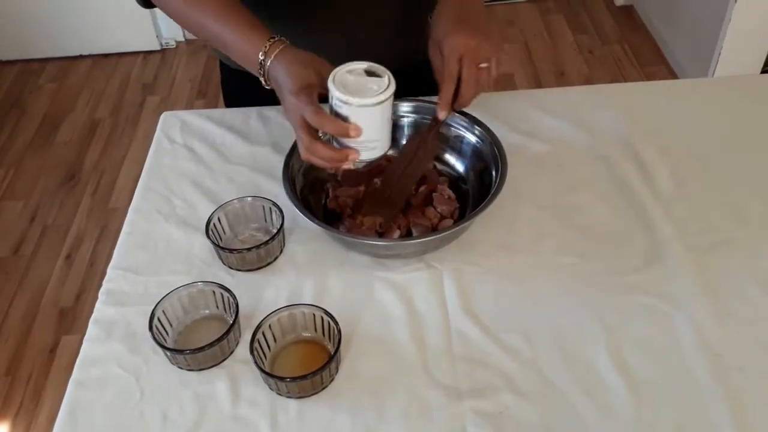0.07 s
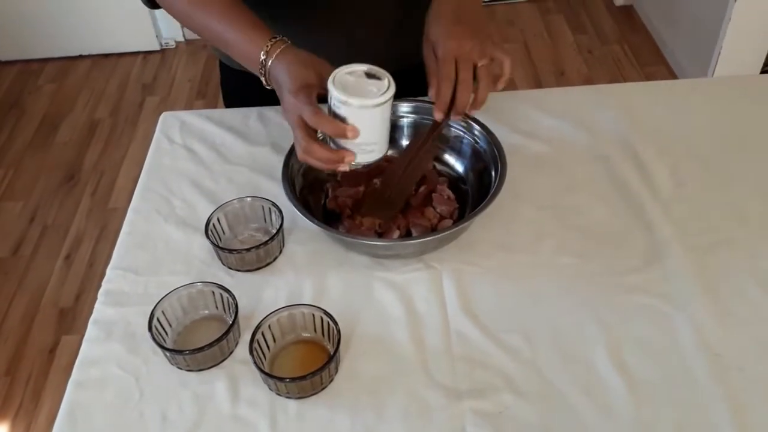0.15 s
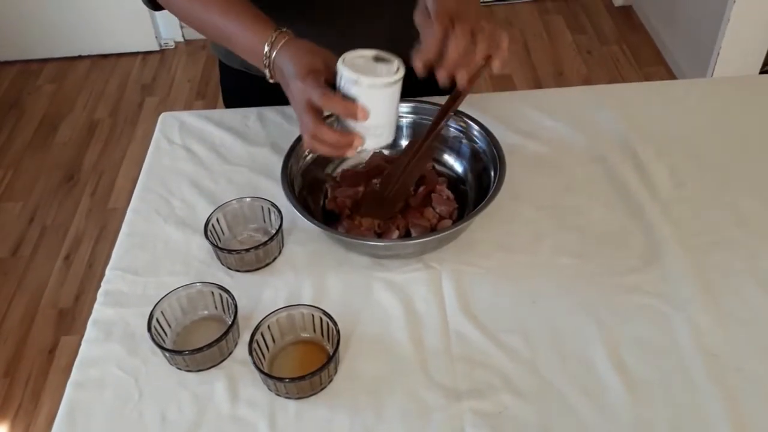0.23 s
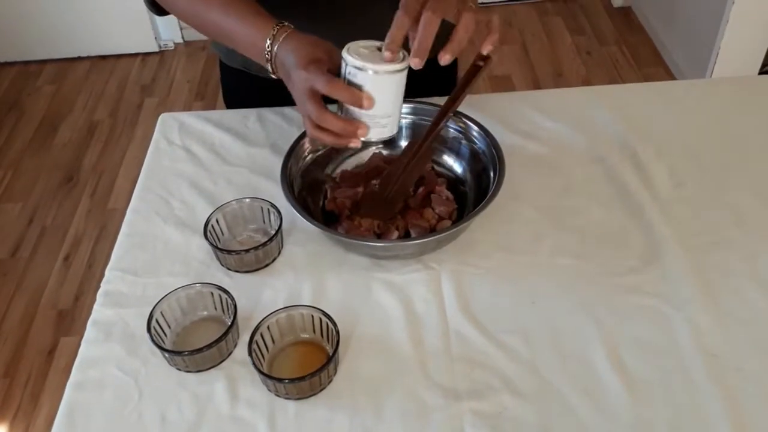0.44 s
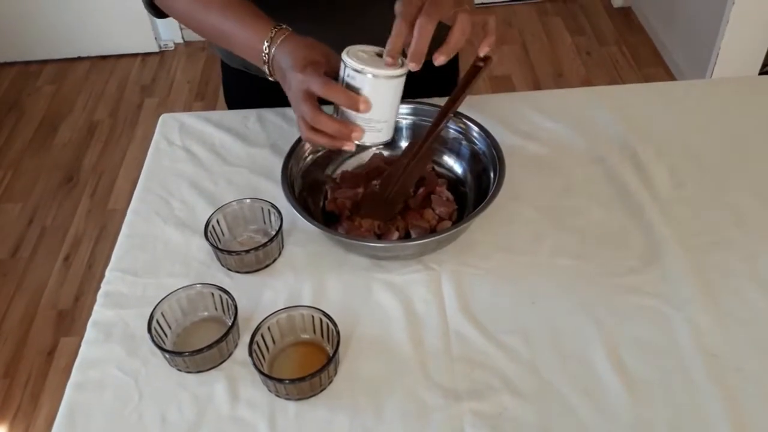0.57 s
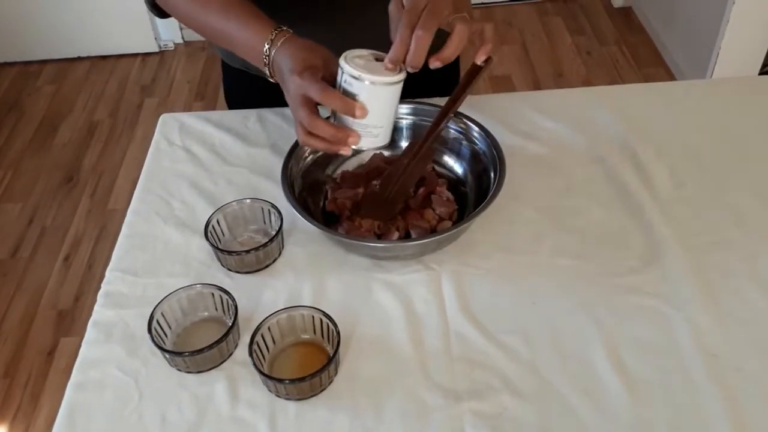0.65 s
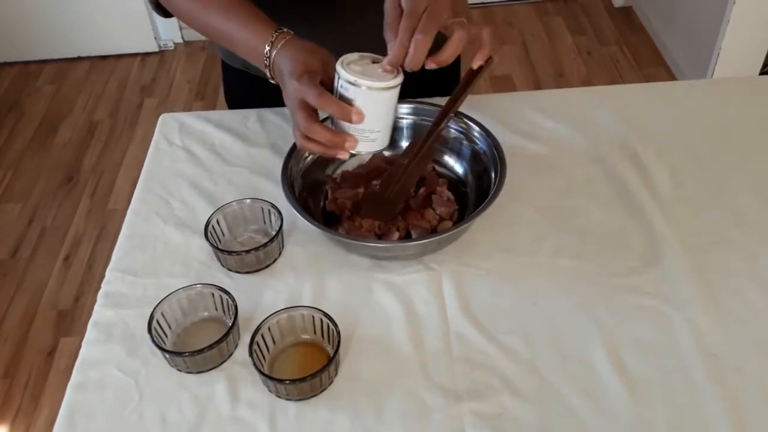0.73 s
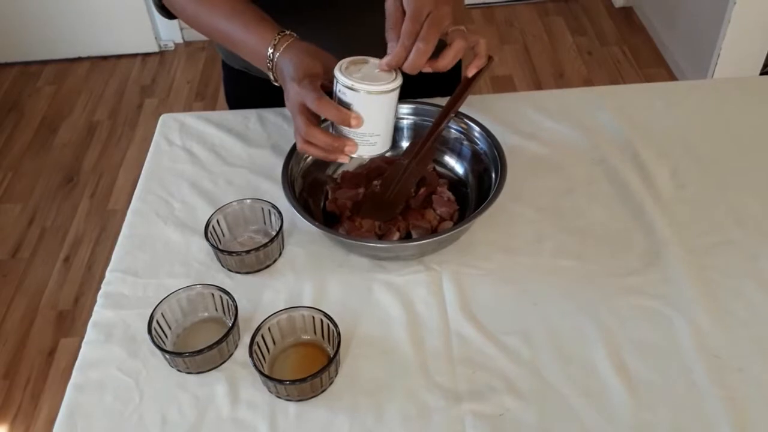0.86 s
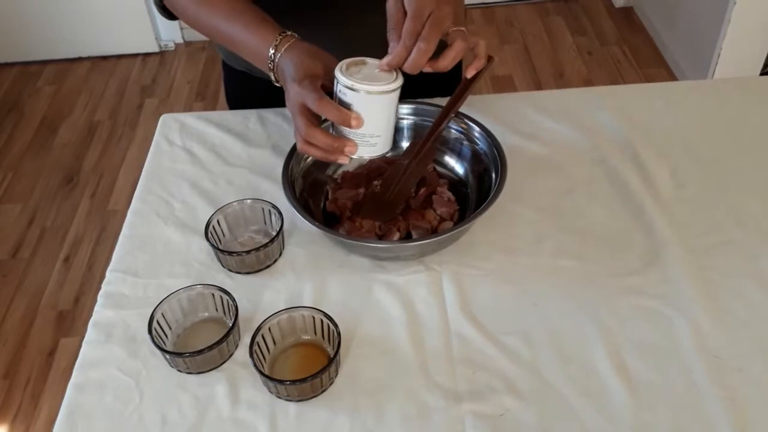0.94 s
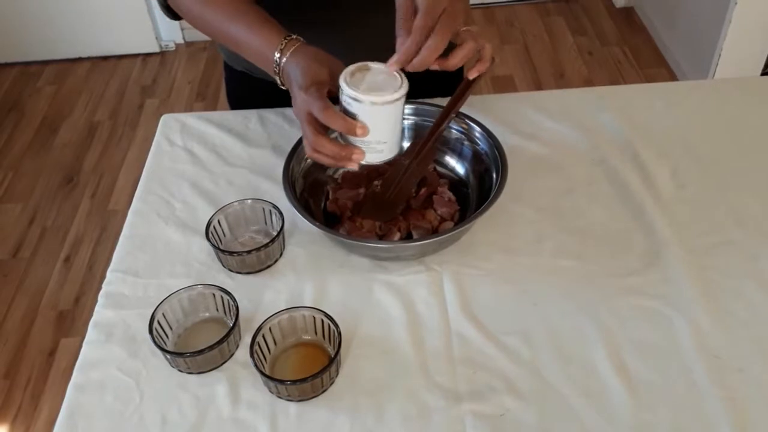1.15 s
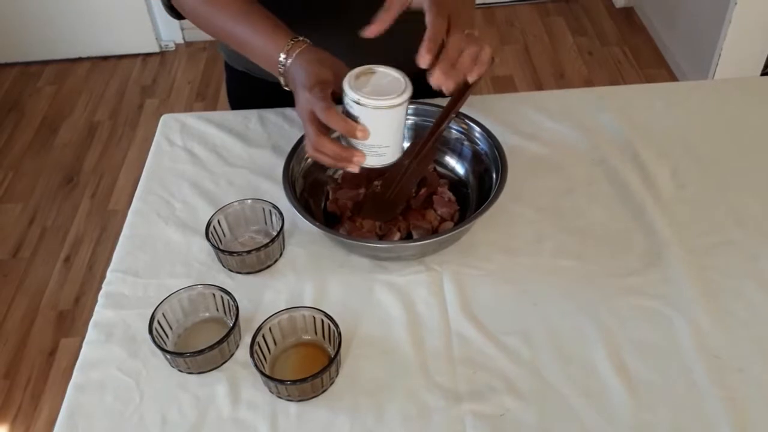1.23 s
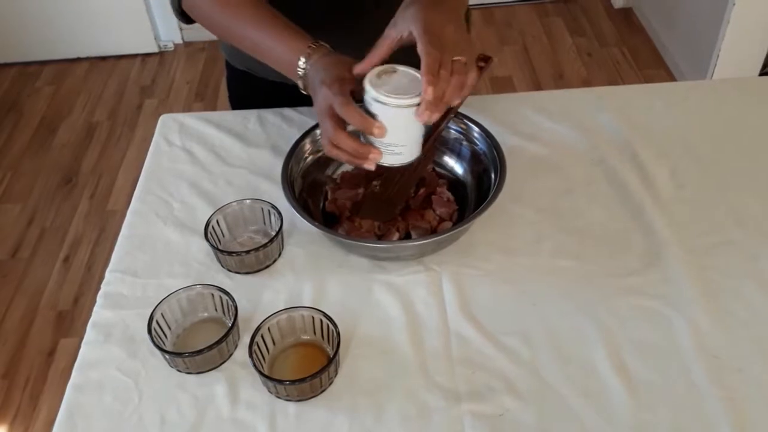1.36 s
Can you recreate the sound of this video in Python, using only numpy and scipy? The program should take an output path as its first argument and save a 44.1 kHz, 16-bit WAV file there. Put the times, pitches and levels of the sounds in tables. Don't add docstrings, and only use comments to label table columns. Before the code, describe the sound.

A steel mixing bowl rings out as a wooden spoon grazes its rim at 0.17 seconds and strikes at 0.2, with an almost instant bounce. The bright, wavering ring decays over about a second. At 0.44 the spoon settles with a faint dull knock. Quiet skin rubbing follows, with small plastic lid clicks and nail taps around 0.7, 0.88 and 0.96, over soft kitchen hum.

```python
import sys
import numpy as np
from scipy import signal
from scipy.fft import rfft, irfft
from scipy.io import wavfile

SR = 44100
rng = np.random.default_rng(int(sys.argv[2]) if len(sys.argv) > 2 else 0)


def voltage_ratio(decibels):
    exponent = np.asarray(decibels, float) / 20
    return 10 ** exponent


def file_out(sig):
    cols = np.atleast_2d(sig).T
    lim = np.clip(cols, -1, 1)
    pcm = np.round(lim * 32767).astype(np.int16)
    wavfile.write(sys.argv[1], SR, pcm)


N = 61739

# [t/s, level/dB]
BLOWS = [
    (0.2033, -4),
    (0.2112, -7),
]
# [t/s, level/dB]
KNOCKS = [
    (.2045, -40),
    (.4387, -30.5),
]


def evened(x):
    return x / np.sqrt(np.mean(x ** 2) + 1e-20)


def read(points, hz):
    f, value = np.transpose(points)
    return np.interp(np.log(hz + 1), np.log(f + 1), value)


def add(mix, s, sound):
    part = mix[round(s * SR):][:len(sound)]
    part += sound[:len(part)]


def rise(size, seconds):
    return 1 - np.exp(-np.arange(size) / SR / max(seconds, 1e-4))


def ring(hz, db, t60, length_s):
    t = np.arange(round(length_s * SR))[:, None] / SR
    decay = voltage_ratio(db - 60 * t / np.asarray(t60))
    return decay * np.sin(2 * np.pi * np.asarray(hz) * t)


def coloured(points, size):
    gain = voltage_ratio(read(points, np.fft.rfftfreq(size, 1 / SR)))
    return evened(irfft(rfft(rng.standard_normal(size)) * gain, size))


def resonate(x, hz, width_hz):
    return signal.lfilter(*signal.iirpeak(hz, hz / width_hz, SR), x)


def bowl():
    # [f/Hz, level/dB, t60/s, side of the node line +-1]
    body_modes = [(956.6, -39.2, .85, 1), (966, -29.8, .58, 1), (968.7, -31.5, .8, -1),
                  (983.7, -34, .65, -1), (2254.3, -18.9, .39, -1), (2258.4, -22.3, .53, 1),
                  (2282.1, -18.6, .09, -1), (2279.9, -30.8, .48, 1), (2289.3, -30.3, .78, 1),
                  (4064.9, -22.6, .33, 1), (4078.3, -20, .31, -1), (4104.2, -35.6, .33, -1),
                  (3895, -44, 1.2, 1), (4135, -34.3, .85, 1)]
    chime_modes = [(3379.4, -31.7, .45, -1), (3418.6, -36.4, .51, 1), (3430.7, -34.1, .51, 1),
                   (3442, -23.4, .38, -1), (3579.2, -21.4, .43, 1), (3583.4, -21.3, .29, 1),
                   (3591.9, -21.9, .45, 1), (3600.2, -16.5, .35, -1), (3624.9, -24.5, .75, -1),
                   (3638.8, -35.2, .39, -1)]
    rim_modes = [(4009, -37, .7, 1), (4648, -20, .17, 1), (4731, -28, .47, 1), (4738, -30, .44, -1),
                 (4965, -36, .5, 1), (4982, -39, .5, -1), (5190, -24, .18, 1), (5366, -29, .46, 1),
                 (5456, -41, .68, 1), (5608, -33, .3, 1), (6115, -32, .33, 1), (6275, -38, .45, 1),
                 (6827, -41, .45, 1), (7272, -32, .28, 1)]
    wall_modes = [(1014.3, -33.3, .38, -1), (1187.9, -37.2, .81, -1), (1216, -31.1, .37, 1),
                  (1229.4, -40, .57, 1), (1243.7, -35.5, 1.1, 1), (1264.3, -25.6, .3, -1),
                  (1340, -32, .3, 1), (1485, -32, .1, 1), (1925.4, -37.3, .65, -1),
                  (1949.5, -29.7, .41, -1), (1964.3, -30.2, .47, 1), (2125, -44, .8, 1), (800, -33, .3, 1),
                  (4182, -31, .3, 1)]
    lip_modes = [(5350, -43.7, .47, -1), (4390, -42, .6, 1), (5219, -43.5, .8, -1), (5905, -50, .8, 1),
                 (6026, -38, .3, 1), (6445, -45, .5, 1), (7050, -38, .3, 1), (7495, -40, .3, 1),
                 (7760, -49, .5, 1), (8010, -52, .6, 1), (8440, -58, .65, 1), (10890, -54, .45, 1)]
    settle_modes = [(533.9, -45.7, .38, 1), (573.6, -40.4, .22, -1), (586, -44, .46, 1),
                    (603.8, -44.3, .52, -1), (639.1, -42.4, .39, -1), (669.5, -54.2, .63, -1)]
    tone_db = 1.04
    strike_s, rise_s, bounce_delay_s, first_share = .2032, .0006, .0085, .55

    hz, db, t60, side = np.transpose(body_modes + chime_modes + rim_modes + wall_modes + lip_modes)
    tone = ring(hz, db + tone_db, t60, 1) @ np.sign(side)
    swell = first_share * rise(len(tone), rise_s)
    add(swell, bounce_delay_s, (1 - first_share) * rise(len(tone), rise_s))
    out = np.zeros(N)
    add(out, strike_s, tone * swell)
    hz, db, t60, side = np.transpose(settle_modes)
    add(out, KNOCKS[-1][0], ring(hz, db, t60, 0.56) @ side)
    return out


def clash():
    # [f/Hz, level/dB]
    shimmer = [(300, -32), (800, -8), (1250, -5.5), (1550, 2), (2800, -3.5), (7300, -7.5), (8500, -18),
               (15500, -18)]
    # [f/Hz, level/dB]
    crack_spectrum = [(150, -11), (600, -8.5), (1250, -11.5), (2500, -3.5), (3700, 2), (6000, -7.5),
                      (10000, 4.5), (15500, -6)]
    # [f/Hz, level/dB, t60/s]
    graze_modes = [(2010, 0, 0.058), (2203, -20.5, 0.15), (3580, -24, 0.143), (3285, -30.5, 0.19),
                   (4200, -22, 0.12), (5188, -20.5, 0.06975), (5625, -21.5, .12), (6200, -25, 0.1577),
                   (8130, -26, 0.11), (8800, -32.5, 0.093), (11650, -33, .04), (12890, -28, .08)]
    # [f/Hz], [level/dB], [t60/s]
    clack_hz = [1280, 3643, 9980]
    clack_db = [-11, -11.5, -28]
    clack_t60_s = [0.026, 0.086, 0.011]
    shimmer_db, shimmer_spread_db, shimmer_t60_s, shimmer_fall = -39, 1.2, .2, 0.11
    crack_db, crack_t60_s = -19.5, 0.015
    graze_s, graze_db, graze_rise_s, graze_shell_db = .1685, -32, .004, -34

    pick = rng.random((700, 4))
    faint_hz = 300 + 16000 * pick[:, 0] ** 1.2
    level_db = shimmer_db + read(shimmer, faint_hz) + shimmer_spread_db * (4 * pick[:, 3] - 2)
    t60 = shimmer_t60_s * (.5 + pick[:, 1]) * (faint_hz / 4000) ** -shimmer_fall
    fade = np.hanning(.8 * SR)[-round(.4 * SR):]
    shell = ring(faint_hz, level_db, t60, .4) @ np.sign(pick[:, 2] - .5) * fade

    out, t = np.zeros(N), np.arange(2048) / SR
    for s, blow_db in BLOWS:
        add(out, s, voltage_ratio(blow_db) * shell * rise(len(shell), 0.00014))
        decay = voltage_ratio(blow_db + crack_db - 60 * t / crack_t60_s)
        add(out, s, decay * coloured(crack_spectrum, 2048) * rise(2048, .0003))
        add(out, s, ring(clack_hz, blow_db + np.array(clack_db), clack_t60_s, .05).sum(1))
    hz, db, t60 = np.transpose(graze_modes)
    touch = ring(hz, db + graze_db, t60, .4).sum(1) + voltage_ratio(graze_shell_db) * shell
    add(out, graze_s, touch * rise(len(touch), graze_rise_s))
    return out


def spoon():
    # [f/Hz, level/dB, t60/s]
    wood_modes = [(198.4, -18, .08), (294.7, -12, 0.0792), (346, -8, .07), (650, 0, .03), (1520, 7, 0.015),
                  (2236, 4.5, .018), (2750, -4, 0.018), (1240, -1, 0.01462)]
    knock_rise_s = .0004
    thump_hz, thump_width_hz, thump_db, thump_t60_s, thump_rise_s = 188, 140, -35.5, 0.32, 0.11

    out = np.zeros(N)
    hz, db, t60 = np.transpose(wood_modes)
    for s, knock_db in KNOCKS:
        knock = ring(hz, db, t60, .4).sum(1)
        add(out, s, voltage_ratio(knock_db) * knock * rise(len(knock), knock_rise_s))
    t = np.arange(SR // 2) / SR
    boom = resonate(rng.standard_normal(len(t)), thump_hz, thump_width_hz)
    boom = evened(resonate(boom, thump_hz, thump_width_hz))
    swell = 1 - np.exp(-t / thump_rise_s)
    add(out, BLOWS[0][0], boom * swell * voltage_ratio(thump_db - 60 * t / thump_t60_s))
    return out


def lid():
    # [t/s, level/dB]
    pressure = [(0.439, -53), (0.676, -84), (0.682, -51), (0.749, -51.5), (.775, -63), (.815, -59),
                (.845, -54), (.91, -57), (0.993, -55), (1.022, -92), (1.13, -73)]
    # [f/Hz, width/Hz, level/dB]
    resonances = [(250, 180, -2), (667, 50, -2.5), (863, 216, 0.5), (1190, 180, -1.5), (1520, 240, 5.5),
                  (1990, 150, -1.5), (2850, 190, -6.5), (3750, 740, 0), (5130, 270, -14), (6460, 390, -9.5),
                  (9700, 1100, -9), (12700, 2000, -9.5)]
    # [t/s, level/dB, brightness/(dB/octave), length/s]
    snaps = [(.6975, -47, 0, .002), (.7065, -48, 0, .002), (.712, -47, 0, .002), (.748, -46, 1, .002),
             (1.09, -50, -9, .03), (1.262, -54, -8, .004), (.6800, -45, 0, .003), (.8755, -40, 3, .003),
             (.9625, -39, 3, .005), (.4385, -47, 6, .001), (.589, -57, 5, .002), (.855, -51, 7, .0005),
             (.868, -50, 7, .0005), (.876, -48, 7, .0005), (.889, -48, 7, .0005), (.922, -52, 7, .0005),
             (.9397, -49, 7, .0005), (.951, -52, 6, .0005)]
    grains_per_s, grain_spread_db, rub_tilt_db, rub_low_db = 1400, 3.5, -2.5, 0
    snap_rise = .2

    t, (when, db) = np.arange(N) / SR, np.transpose(pressure)
    grains = voltage_ratio(grain_spread_db * np.minimum(rng.exponential(1, N), 2.5))
    grains *= rng.random(N) < grains_per_s / SR
    grains = grains * rng.standard_normal(N) + 0.18 * rng.standard_normal(N)
    parts = np.array([resonate(grains, f, w) * voltage_ratio(d + rub_tilt_db * np.log2(f / 2000)) / np.sqrt(w)
                      for f, w, d in resonances])
    press = voltage_ratio(np.interp(t, when, db, right=-100))
    low = evened(resonate(parts[0], 343, 290))
    out = evened(parts[1:].sum(0)) * press + voltage_ratio(rub_low_db) * low * np.sqrt(press * voltage_ratio(-62))
    out *= t > when[0]

    u = np.arange(1024) / SR
    for s, snap_db, tilt_db, length in snaps:
        push = rng.standard_normal(1024) * voltage_ratio(-20 * u / length) * rise(1024, snap_rise * length)
        snap = np.zeros(1024)
        for f, w, d in resonances:
            gain = voltage_ratio(d + tilt_db * np.log2(f / 2000)) / np.sqrt(w)
            snap += resonate(resonate(push, f, 2 * w), f, w) * gain
        add(out, s, voltage_ratio(snap_db) * snap / abs(snap).max())
    return out


def nail_taps():
    # [t/s, level/dB, f/Hz, length/s]
    tap_events = [(.6795, -43.5, 770, 0.0046), (.6798, -45, 2210, .004), (.695, -45, 707, 0.0044),
                  (.705, -49, 745, 0.0037), (.7055, -48.5, 3730, 0.0023), (.7215, -45, 1627, 0.0083),
                  (.730, -54, 1557, 0.0066), (.7435, -42.5, 650, 0.0024), (.7435, -46.5, 1640, 0.0027),
                  (.866, -60, 1590, 0.0055), (.875, -44.5, 3510, 0.0035), (.8755, -42.5, 980, 0.0027),
                  (.8765, -47, 1680, 0.0034), (.961, -47.5, 3750, 0.0017), (.9615, -41, 914, 0.0041),
                  (.9625, -45, 1630, 0.005), (.969, -45.5, 1910, 0.0027), (.981, -59, 1615, 0.0058),
                  (1.005, -76, 1600, .009)]
    out = np.zeros(N)
    for s, tap_db, hz, length in tap_events:
        t = np.arange(0, 2 * length, 1 / SR)
        swell = np.sin(np.pi * np.sqrt(t / (2 * length))) ** 2
        add(out, s, voltage_ratio(tap_db) * swell * np.sin(2 * np.pi * hz * t))
    return out


def kitchen(x):
    # [f/Hz, t60/s]
    reverb_t60 = [(150, 0.13), (600, 0.61), (2000, 0.35), (5000, 0.45), (9000, 0.3), (15000, 0.26)]
    reflections = np.zeros(SR)
    at = np.arange(300, SR - 20, 20)
    reflections[at + rng.integers(0, 20, len(at))] = rng.choice([-1., 1.], len(at))
    hz, t, z = signal.stft(reflections, SR, nperseg=256)
    decay = voltage_ratio(-60 * t / read(reverb_t60, hz)[:, None])
    tail = signal.istft(z * decay, SR, nperseg=256)[1]
    return signal.fftconvolve(x, tail / np.linalg.norm(tail))[:N]


def hum():
    # [f/Hz, level/dB]
    hiss_spectrum = [(12, -52.5), (20, -11.5), (102, -7.5), (165, -10), (372, -8), (416, -20.5),
                     (1510, -17.5), (14700, -38.5), (16500, -44)]
    # [f/Hz, width/Hz, level/dB]
    drone_peaks = [(395, 140, -10.5), (1088, 6.7, -9.5), (1530, 13, -12.5)]
    hiss_db, drone_db = -65, -67
    noise, drone = rng.standard_normal(N), np.zeros(N)
    for f, w, d in drone_peaks:
        drone += evened(resonate(resonate(noise, f, w), f, w)) * voltage_ratio(d) * np.sqrt(w)
    return voltage_ratio(hiss_db) * coloured(hiss_spectrum, N) + voltage_ratio(drone_db) * evened(drone)


def scene():
    low_cut_hz, tone_room_db, room_db = 100, -28, -4.5
    tone = bowl()
    near = clash() + spoon() + lid() + nail_taps()
    near = signal.sosfilt(signal.butter(4, low_cut_hz, "high", fs=SR, output="sos"), near)
    room = kitchen(voltage_ratio(tone_room_db) * tone + voltage_ratio(room_db) * near)
    return (tone + near + room + hum())[None]


def roll_off(x):
    return signal.sosfilt(signal.butter(12, 16820, fs=SR, output="sos"), x)


def record(dry):
    edge = signal.firwin(255, 16050, fs=SR)
    mix = signal.oaconvolve(dry, edge[None], "same")
    return roll_off(mix)


dry = scene()
out = record(dry)
file_out(out)
```